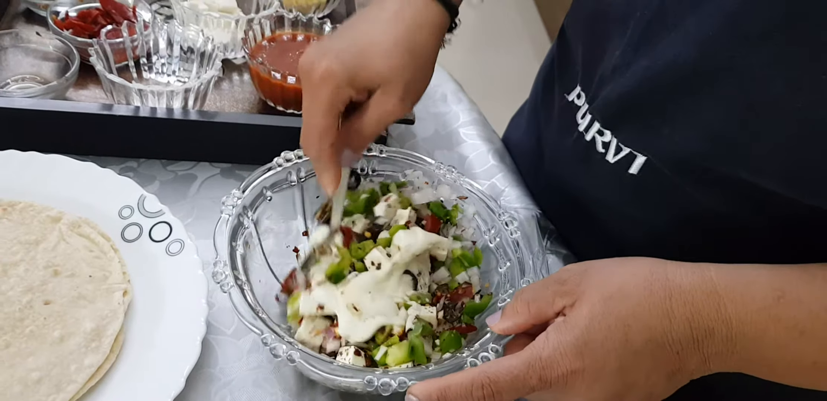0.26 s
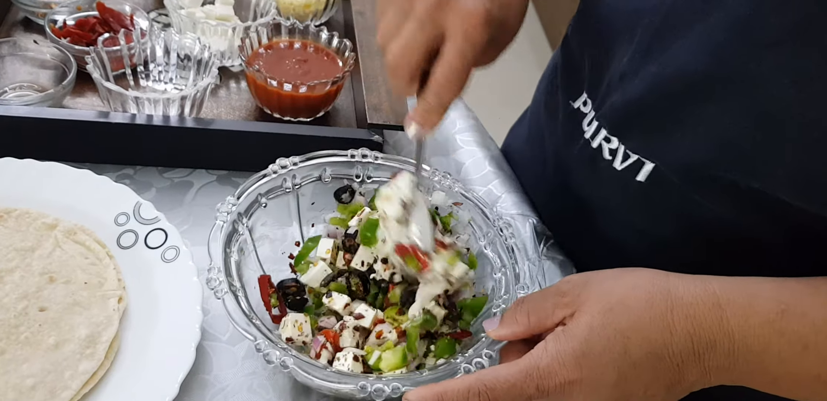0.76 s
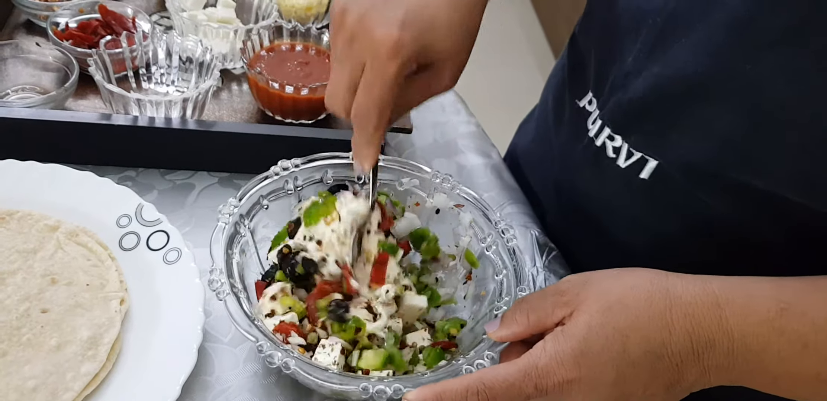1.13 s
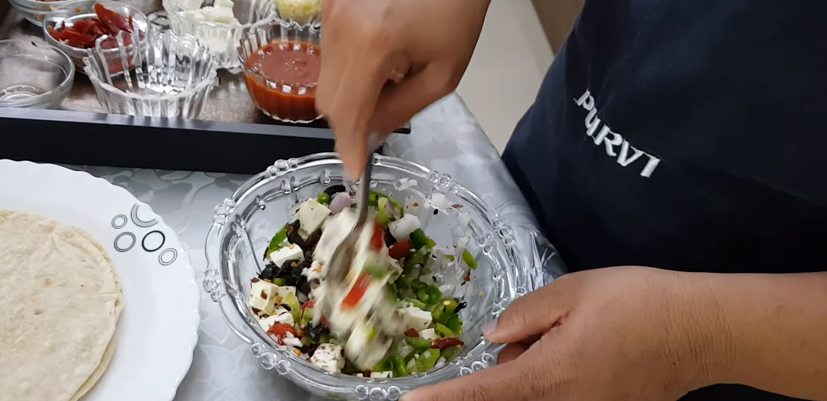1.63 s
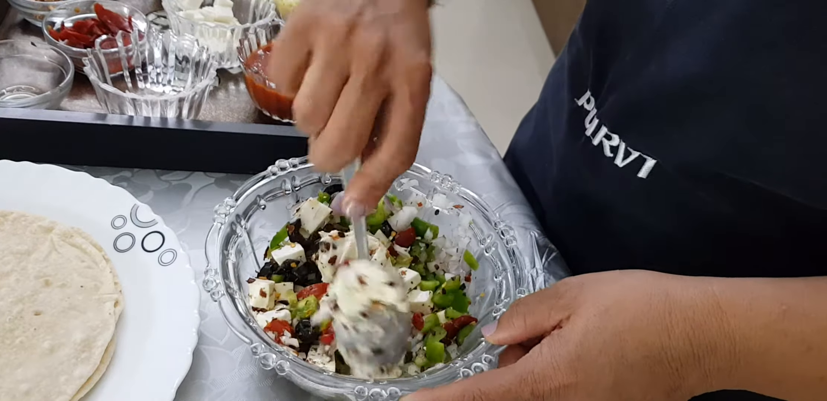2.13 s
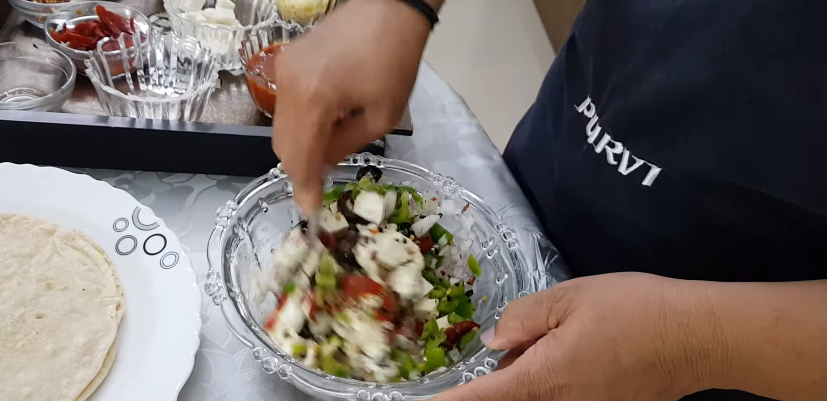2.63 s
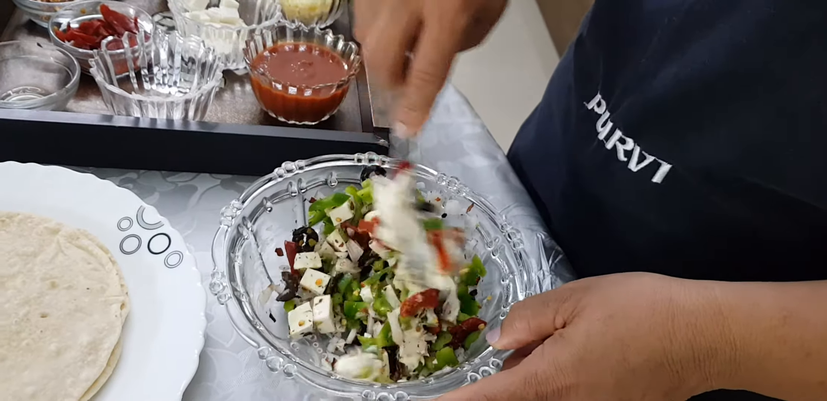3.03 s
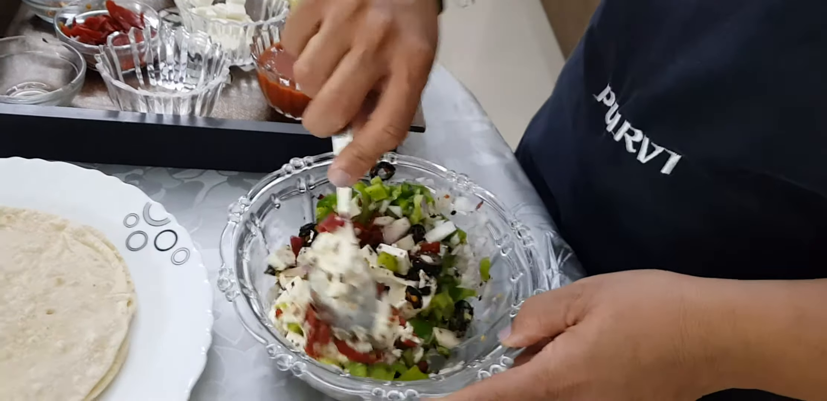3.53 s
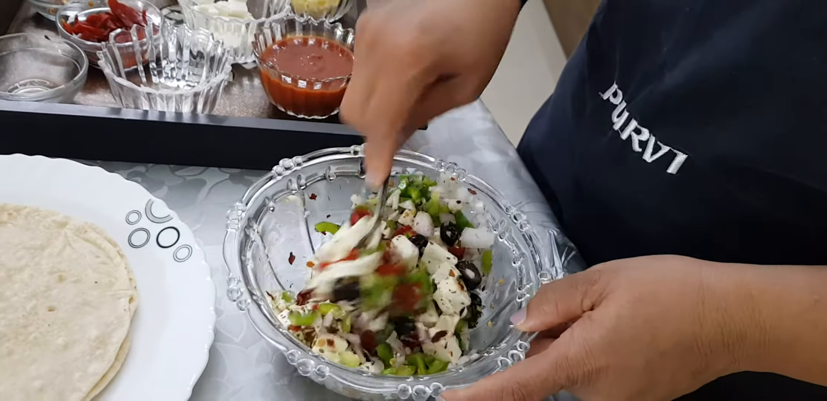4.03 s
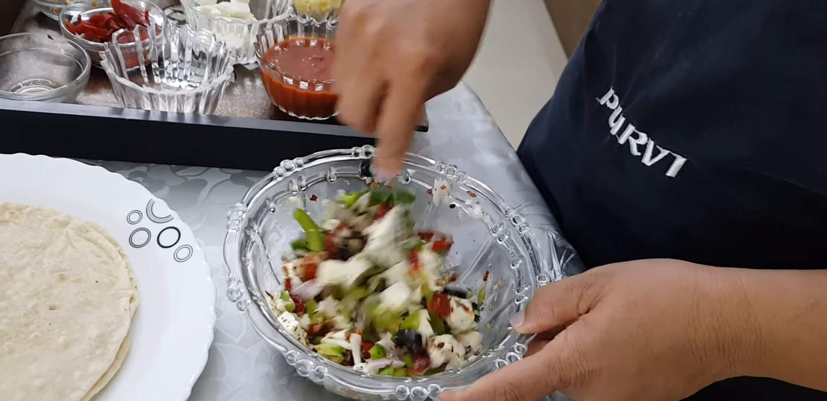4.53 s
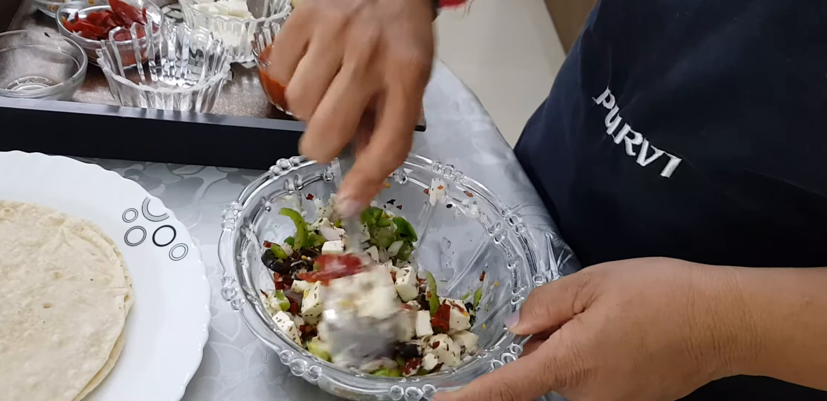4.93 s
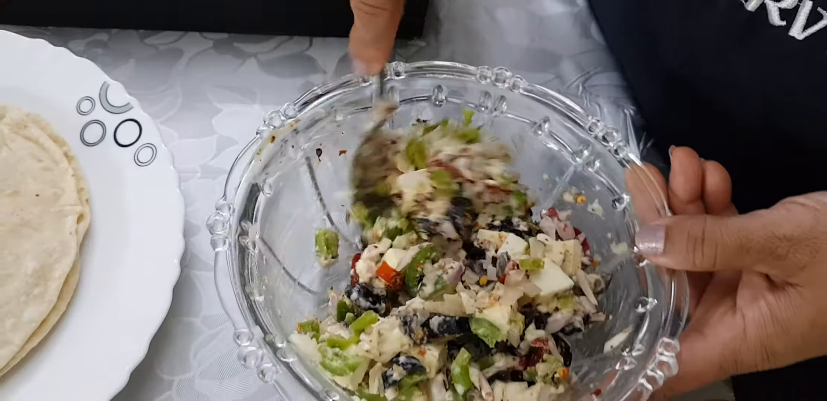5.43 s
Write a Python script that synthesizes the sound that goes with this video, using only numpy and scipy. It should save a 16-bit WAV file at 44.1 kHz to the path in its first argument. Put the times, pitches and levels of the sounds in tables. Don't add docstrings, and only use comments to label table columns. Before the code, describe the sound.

A metal spoon stirs wet chopped food in a thick glass bowl, with sparse bright clinks, dull knocks and soft ticks in a reverberant kitchen.

```python
import sys
import numpy as np
from scipy import signal
from scipy.io import wavfile

SR = 44100
rng = np.random.default_rng(int(sys.argv[2]) if len(sys.argv) > 2 else 0)


def wav_record(signal):
    frames = np.transpose(np.atleast_2d(signal))
    bounded = np.clip(frames, -1, 1)
    quanta = np.round(bounded * 32767).astype(np.int16)
    wavfile.write(sys.argv[1], SR, quanta)


def amplitude_ratio(level_db):
    exponent = np.asarray(level_db, float) / 20
    return 10 ** exponent


N = 249854
LEAD = 4410


def at_hz(points, hz, column=1):
    points = np.array(points)
    return np.interp(np.log(hz), np.log(points[:, 0]), points[:, column])


def rms_one(x):
    return x / np.sqrt(np.mean(x ** 2) + 1e-20)


def sides(pan_db):
    return amplitude_ratio(np.multiply.outer([.5, -.5, 0], np.clip(pan_db, -10, 10)))


def drift(rate_hz):
    r = np.exp(-80 * np.pi * rate_hz / SR)
    slow = signal.lfilter([1], [1, -2 * r, r * r], rng.standard_normal(N // 40 + 2002))[2000:]
    return np.interp(np.arange(N) / 40, np.arange(len(slow)), rms_one(slow))


def ring(clicks, hz, t60):
    r = amplitude_ratio(-60 / (t60 * SR))
    w = 2 * np.pi * hz / SR
    return signal.lfilter([0, np.sin(w)], [1, -2 * r * np.cos(w), r * r], clicks + 1e-18)


def resonance(x, hz, width_hz):
    r = np.exp(-np.pi * width_hz / SR)
    top = np.array([1, 0, -1]) * (1 - r * r) / 2
    return signal.lfilter(top, [1, -2 * r * np.cos(2 * np.pi * hz / SR), r * r], x)


def bands(white):
    edges_hz = 25 * 2 ** np.arange(0, 9.6, .5)
    for k, (low, high) in enumerate(zip(edges_hz, edges_hz[1:])):
        band = signal.butter(2, [low, high], "band", fs=SR, output="sos")
        yield np.sqrt(low * high), signal.sosfilt(band, white[k % 2])


def struck(blows, spots, spot_mid_db, pitches, modes, level_db, crack_db, spread_s):
    s, peak_db, low_db, high_db, pan_db = np.transpose(blows)
    mid_db = np.array(spot_mid_db)[spots]
    crack = [(hz, 6 / hz, *[crack_db] * 3) for hz in np.geomspace(600, 14000, 10)]
    modes = [(hz, *mode) for hz, mode in zip(pitches, modes)] + crack
    luck = rng.standard_normal((len(blows), len(modes), 3, 3))
    scatter_db = 1.5 * np.array([[1], [1], [0]])
    out = np.zeros((3, LEAD + N))
    t = np.arange(N) / SR
    contact = np.minimum(t / 0.00065, 1) * (np.array([[.4], [.4], [.7]]) + np.exp(-t / 0.0044))
    for k, (hz, t60, *spot_db) in enumerate(modes):
        mode_db = np.array(spot_db)[spots]
        tilt_db = [at_hz([(1000, low), (2500, mid), (4700, 0), (10000, high)], hz)
                   for low, mid, high in zip(low_db, mid_db, high_db)]
        uneven_db = scatter_db * luck[:, k, :, 0].T
        size = sides(pan_db) * amplitude_ratio(level_db + mode_db + peak_db + tilt_db + uneven_db)
        lag = (spread_s * SR * np.abs(luck[:, k, :, 1]) * [1, 1, 0]).astype(int)
        for blow, start in enumerate(LEAD + (s * SR).astype(int)):
            length = min(int(t60 * SR) + 200, LEAD + N - start)
            signs = [*np.sign(luck[blow, k, :2, 2]), (-1) ** k]
            clicks = np.zeros((3, length))
            clicks[[0, 1, 2], lag[blow]] = size[:, blow] * signs
            out[:, start:start + length] += ring(clicks, hz, t60) * contact[:, :length]
    return out


def rim_clinks():
    # start in seconds (negative: before the sound begins), peak in dB near 4.7 kHz, dB near 1 kHz and
    # near 10 kHz relative to it, left-right balance in dB.
    rim_blows = [
        (-0.055, -17.5, -21.5, -3.5, 1),
                 (1.7082, -15.5, -11.5, 1.5, 10.5),
        (2.227, -38.5, -13.5, 6, -17),
        (3.7166, -34, -19, 0, 0.5),
        (5.0136, -22, -21, -3.5, 3),
        (5.0235, -25.5, -19, -5.5, -25),
        (5.1294, -30.5, -21, -12, 10.5),
    ]
    rim_spots = [1, 0, 2, 2, 1, 1, 2]
    rim_mid_db = [-3, -0.6, 4]
    # t60 in seconds, level in dB from each of the three spots.
    rim_hz = [730, 1055, 1062, 1096, 1210, 1900, 2685, 2690, 3520, 4180, 4800, 4806, 4915, 5220, 6400, 7010,
              8680, 9370, 9630, 10240, 10880, 11700, 12260, 13750, 14500, 15550]
    rim_modes = [(0.091, -2.5, -5.5, -22), (0.06, 0.5, 15, 8.5), (.45, -25, -7, -21.5),
                 (.05, -9, -3.5, -15), (0.042, -8.5, -19, 7.5), (0.0092, -5.5, 4, 5.5),
                 (0.04, 1.5, -2, -3.5), (0.8, -24.5, -19, -39.5), (0.0094, -4.5, -1.5, -22.5),
                 (0.0078, -16.5, -10.5, 4), (0.017, 0, 5.5, 4), (0.48, -14, -17.5, -31),
                 (0.046, 5, -17, 0.5), (0.0044, -14, 8.5, 13.5), (0.035, -13, -4.5, -6.5),
                 (0.058, -9, -6.5, -6.5), (0.015, -26, 4.5, -13.5), (0.039, -1, -3.5, 2.5),
                 (.03, -10.5, 8.5, -37), (.025, -3, -1.5, -1), (.03, -16, 3, -7.5), (.03, -13, -2, -12),
                 (0.025, -6.5, -14.5, -15), (.02, -12, -5, -16), (.015, -12, 5.5, -25.5),
                 (.02, -19.5, -25.5, -11)]
    return struck(rim_blows, rim_spots, rim_mid_db, rim_hz, rim_modes,
                  level_db=-0.5, crack_db=-5.5, spread_s=.0005)


def belly_knocks():
    # start in seconds, peak in dB near 4.7 kHz, dB near 1 kHz and near 10 kHz relative to it,
    # left-right balance in dB.
    knocks = [
        (0.088, -24, -18, -12, -9),
        (1.3707, -39, -9.5, -11, 10),
        (2.4044, -33.5, -16, -8.5, 5),
        (3.7481, -6, -27.5, -9.5, 11),
        (4.5183, -7.5, -26, -1, 1),
        (5.2775, -26, -18.5, -15.5, -18),
    ]
    belly_spots = [0, 1, 0, 0, 1, 0]
    belly_mid_db = [-11.5, -11.5]
    # t60 in seconds, level in dB from each of the two spots.
    belly_hz = [420, 750, 1050, 1210, 1880, 2050, 2500, 3050, 3550, 4150, 4450, 4800, 5450, 6100, 6700,
                7300, 8180, 8850, 9350, 10280, 10900, 11500, 12260, 13850, 14200]
    belly_modes = [(.02, 1, -12), (0.022, -19, -11), (0.09, -0.5, 8), (0.015, 8.5, 14.5),
                   (0.029, -22.5, 11.5), (0.018, 1.5, 4.5), (0.0067, 1, 4.5), (0.0078, -2.5, -15),
                   (0.0089, -12, -23), (0.008, 2.5, 3.5), (0.006, -19.5, -2), (0.031, -9.5, -3.5),
                   (0.007, -16, -9), (0.0079, -9.5, -8), (0.013, -13, -11), (0.0058, -8, -1),
                   (0.014, -9, -6.5), (.015, 0.5, -6.5), (0.014, -6.5, -17.5), (0.012, 0, -19.5),
                   (0.025, -13.5, -19.5), (0.02, -10, -16), (0.0056, -3.5, -9.5), (0.0099, -2.5, -8),
                   (0.007, -1, -25)]
    return struck(knocks, belly_spots, belly_mid_db, belly_hz, belly_modes,
                  level_db=-3.5, crack_db=-15.0, spread_s=0.00035)


def snaps(rows, t60, width, edge, level_db, walls_db):
    out = np.zeros((3, LEAD + N))
    t = np.arange(900) / SR
    for (s, peak_db, hz, pan_db), white in zip(rows, rng.standard_normal((len(rows), 3, 900))):
        snap = (white + white[0]) * amplitude_ratio(-60 * t / t60)
        snap = resonance(snap, hz, width * hz) + edge * np.diff(snap, prepend=0)
        at = LEAD + round(s * SR)
        out[:, at:at + 900] += amplitude_ratio(peak_db + level_db) * sides(pan_db)[:, None] * snap / np.abs(snap).max()
    return out * amplitude_ratio(np.array([[0], [0], [walls_db]]))


def wet_ticks():
    # start in seconds, peak in dB, pitch in Hz, left-right balance in dB.
    tick_rows = [(0.7712, -46.5, 4220, -7), (0.8694, -49, 4100, -2), (0.9426, -37.5, 6570, 3),
                 (1.0214, -38, 6500, -1), (1.0824, -41, 6050, -6), (1.3404, -38, 6610, -13),
                 (1.3504, -33.5, 4010, -6), (1.4414, -49, 2980, 2), (1.5391, -38, 6600, -16),
                 (1.5475, -40.5, 6400, -9), (2.357, -38.5, 4700, -5), (2.5809, -39.5, 6750, -4),
                 (2.6105, -51, 5550, -7), (2.6799, -40, 5370, -2), (3.1176, -43, 12500, -10.5),
                 (3.1924, -37.5, 11460, -2), (3.2152, -41.5, 4300, -3), (3.2214, -51.5, 9900, -8),
                 (3.2565, -48.5, 8500, -2.5), (3.2888, -28.5, 5900, -9), (3.3429, -46, 5000, -4),
                 (3.3615, -30.5, 4600, -17), (3.6117, -41.5, 6460, -5), (4.0274, -38.5, 11300, -12),
                 (4.8834, -45.5, 11280, -2), (4.908, -56, 11000, 2), (4.157, -44, 11000, 0),
                 (5.2775, -20, 4640, -7), (5.278, -35, 2140, 0), (5.3135, -39, 9500, 7.5)]
    return snaps(tick_rows, t60=0.0089, width=.3, edge=0.1, level_db=-3, walls_db=-5)


def bowl_thuds():
    # start in seconds, peak in dB, pitch in Hz, left-right balance in dB.
    thud_rows = [(1.371, -35, 3088, 5), (1.372, -31, 256, -4), (1.7082, -15, 1490, 1),
                 (1.7085, -24, 560, 10.5), (1.800, -20, 298, 2), (1.802, -40, 169, 10),
                 (1.801, -35, 740, 9), (3.750, -24, 492, -2), (3.862, -43, 760, 3),
                 (4.519, -17.5, 1590, -5.5), (4.52, -21, 490, -7)]
    return snaps(thud_rows, t60=0.033, width=1.0, edge=.0003, level_db=0.0, walls_db=6.5)


def stirring():
    # start in seconds, length in seconds, level in dB at 5 kHz at the height, top end in relative dB.
    strokes = [(0.83, 0.33, -59, -1.5), (1.304, 0.11, -63, 4), (1.403, 0.19, -73, 5),
               (2.579, 0.18, -57.5, 0.5), (3.106, 0.3, -67.5, 5.5), (3.267, 0.12, -67.5, -5.5),
               (3.58, 0.2, -63.5, 2), (4.006, 0.09, -70.5, 9.5), (4.858, 0.16, -68.5, 3),
               (5.287, 0.12, -62, 8.5), (5.502, 0.092, -75.5, 7.5)]
    # resonance in Hz, width in Hz, level in dB.
    colours = [
        [(4180, 900, -6.5), (5790, 1500, -2), (6810, 1440, -9)],
        [(9900, 1000, 3.5), (12000, 2700, -4), (14300, 2500, -10.5)],
    ]
    height_at, edge_db = 0.41, -16.5
    sizes = amplitude_ratio(2.5 * np.minimum(rng.exponential(1, (2, N)), 5)) * rng.choice([-1, 1], (2, N))
    grains_per_s = 5000 * amplitude_ratio(4 * drift(25))
    grains = sizes * (rng.random(N) < grains_per_s / SR)
    low, top = [rms_one(sum(amplitude_ratio(db) * resonance(grains, hz, width_hz) for hz, width_hz, db in part))
                for part in colours]
    out, t = 0, np.arange(N) / SR
    for s, length_s, level_db, top_db in strokes:
        end = s + length_s
        moments = [s - .015, s, s + height_at * length_s, end, end + 0.086]
        swell_db = np.interp(t, moments, [-60, edge_db, 0, edge_db, -60])
        out = out + amplitude_ratio(level_db + swell_db) * (low + amplitude_ratio(top_db) * top)
    return out


def bumps():
    # start in seconds, peak in dB, first pitch in Hz, last pitch in Hz, sign.
    swings = [
        (3.288, -5, 467, 370, 1),
        (3.2900, -10, 335, 69.5, -1),
        (3.325, -15, 205, 55, 1),
        (3.341, -8, 105, 63, 1),
        (3.3622, -6, 386, 49.3, -1),
        (3.819, -23, 85.4, 53, 1),
        (4.036, -34, 73.4, 45, 1),
    ]
    # start in seconds, peak in dB, pitch in Hz.
    clacks = [
        (3.2884, 1.5, 516),
        (3.3612, -12.5, 740),
    ]
    out, t = np.zeros((2, N)), np.arange(8000) / SR
    for s, peak_db, first_hz, last_hz, sign in swings:
        t60 = 0.077 / (1 + (last_hz / 108) ** 2)
        turns = last_hz * t + (first_hz - last_hz) * 0.0024 * (1 - np.exp(-t / 0.0022))
        wave = sign * amplitude_ratio(peak_db - 60 * t / t60) * np.sin(2 * np.pi * turns)
        soft_contact = signal.butter(2, 4.4 * first_hz, fs=SR, output="sos")
        wave = signal.sosfilt(soft_contact, wave)
        at = round(s * SR)
        out[:, at:at + 8000] += wave * [[.03], [1]]
    for s, peak_db, hz in clacks:
        clack = amplitude_ratio(peak_db - 60 * t / 0.0061) * np.sin(2 * np.pi * hz * t) * np.minimum(t / 0.0024, 1)
        at = round(s * SR)
        out[:, at:at + 8000] -= clack * [[1], [.4]]
    return out


def kitchen(x):
    # pitch in Hz, t60 in seconds, level in dB.
    decay = [(250, 0.57, -1), (963, 0.74, 4.5), (2650, 0.84, -3.5), (5000, 0.78, -5.5), (9600, 0.64, -12.5),
             (16180, 0.19, 3.5)]
    tail_db, first_wall_s, counter_db = -32.5, 0.002, -9.5
    t = np.arange(SR) / SR
    white = rng.standard_normal((2, 2, SR))
    tail = sum(band * amplitude_ratio(at_hz(decay, hz, column=2) - 60 * t / at_hz(decay, hz)) for hz, band in bands(white))
    tail = amplitude_ratio(tail_db) * tail * np.clip(t / first_wall_s - .5, 0, 1)
    counter_at = (np.array([.0011, .0033, .0014, .0029]) * SR).astype(int)
    tail[[0, 0, 1, 1], counter_at] += amplitude_ratio(counter_db)
    return x[:2] + signal.fftconvolve(x[2:], tail, axes=1)[:, :x.shape[1]]


def murmur():
    # pitch in Hz, level in dB per Hz.
    air_colour = [(18, -48.5), (30, -10.5), (103, -4.5), (190, -7.5), (225, -9.5), (366, -3.5),
                  (532, -10.5), (573, -9.5), (1600, -12.5), (2600, -28), (3380, -65), (5720, -120)]
    hiss_colour = [(15, -31.5), (2000, -4), (4000, -20.5), (5500, -3), (7800, -16.5), (10000, -1.5),
                   (15000, -2), (16500, -13)]
    # pitch in Hz, left-right likeness from -1 to 1.
    likeness = [(60, 0.97), (130, 0.77), (290, 0.93), (640, 0.51), (1410, -0.31), (3100, 0.43),
                (6820, -0.82), (15000, 0.018)]
    # pitch in Hz, width in Hz, level in dB.
    hum_rows = [(109, 2.6, -67), (199, 31, -64.5), (307.5, 5.8, -70.5), (348, 6.7, -74)]
    # time in seconds, level in dB.
    swell = [(0, -53), (.6, -56), (1.9, -53), (2.9, -55), (4.299, -54.5), (5.67, -55.5)]
    air, hiss, together = 0, 0, drift(1.3)
    for hz, (mid, side) in bands(rng.standard_normal((2, 2, N))):
        alike = np.clip(at_hz(likeness, hz), -1, 1)
        pair = np.sqrt(1 + alike) * mid + np.sqrt(1 - alike) * side * [[1], [-1]]
        flicker_db = 1.2 * together + 1.6 * drift(12)
        air = air + amplitude_ratio(at_hz(air_colour, hz) + flicker_db) * pair
        hiss = hiss + amplitude_ratio(at_hz(hiss_colour, hz)) * pair
    air = signal.sosfilt(signal.butter(4, 2300, fs=SR, output="sos"), air)
    white = rng.standard_normal(N)
    hums = sum(amplitude_ratio(db + 54.0) * rms_one(resonance(white, hz, width_hz)) for hz, width_hz, db in hum_rows)
    swell_db = np.interp(np.arange(N) / SR, *np.transpose(swell)) + 3
    return amplitude_ratio(swell_db) * (rms_one(air) + hums) + amplitude_ratio(-70) * rms_one(hiss)


def scene():
    bowl = rim_clinks() + belly_knocks() + wet_ticks() + bowl_thuds()
    return kitchen(bowl)[:, LEAD:] + stirring() + bumps() + murmur()


def low_pass(x):
    return signal.sosfilt(signal.butter(12, 16530, fs=SR, output="sos"), x)


def record(dry):
    heard = signal.sosfilt(signal.butter(2, 45, "high", fs=SR, output="sos"), dry)
    heard = signal.sosfilt(signal.cheby2(14, 40, 16050, fs=SR, output="sos"), heard)
    return low_pass(1.5 * np.tanh(heard / 1.5))


dry = scene()
out = record(dry)
wav_record(out)
```